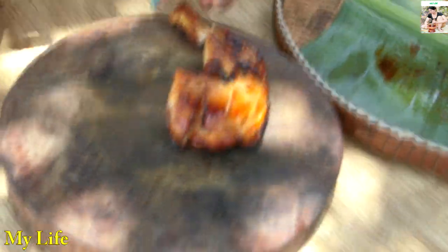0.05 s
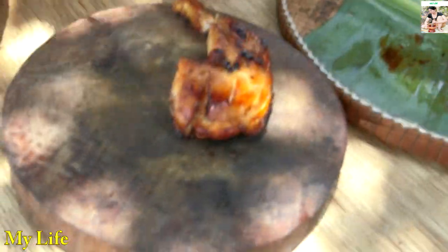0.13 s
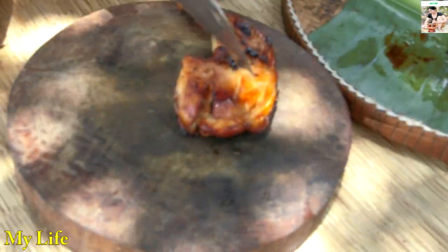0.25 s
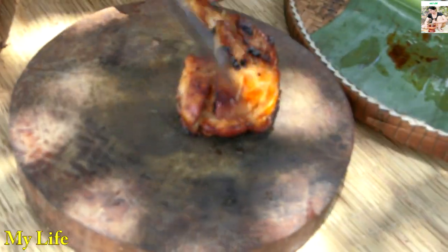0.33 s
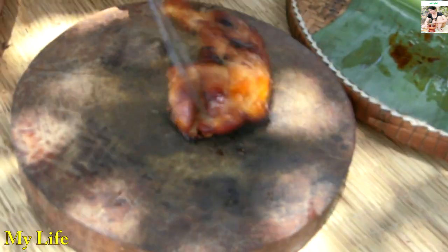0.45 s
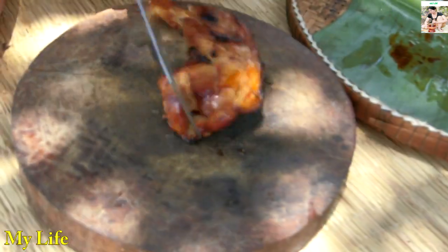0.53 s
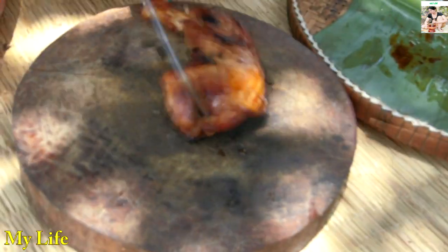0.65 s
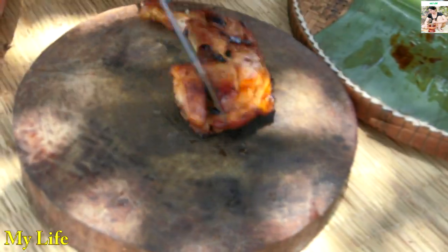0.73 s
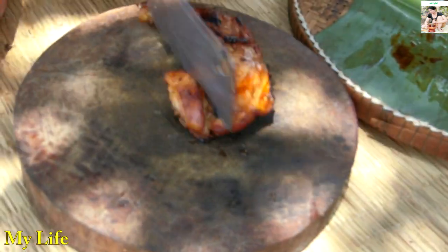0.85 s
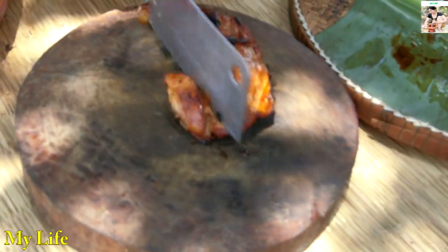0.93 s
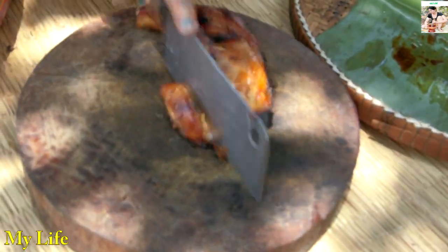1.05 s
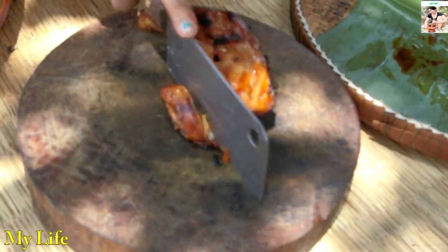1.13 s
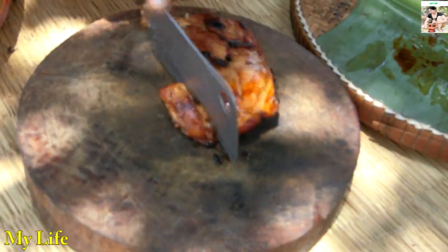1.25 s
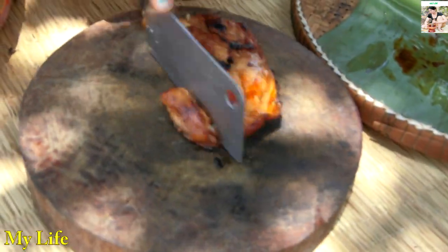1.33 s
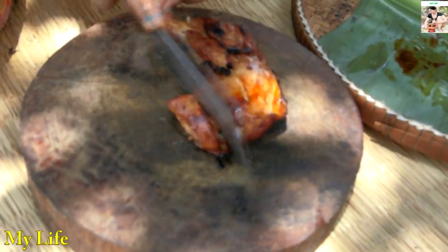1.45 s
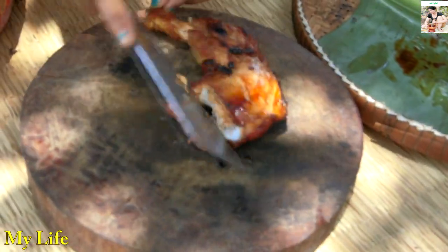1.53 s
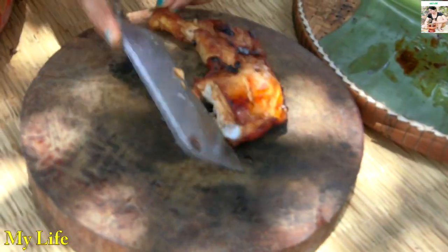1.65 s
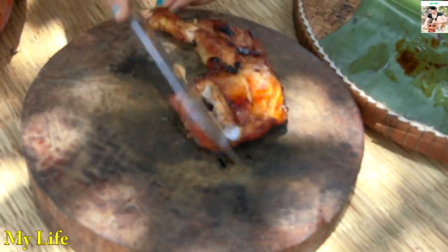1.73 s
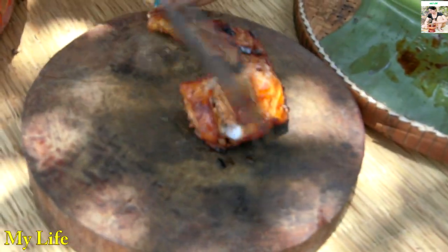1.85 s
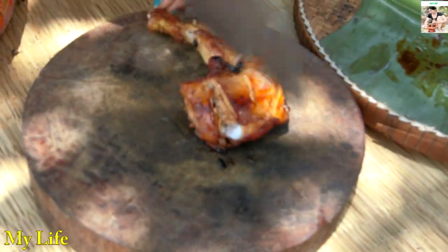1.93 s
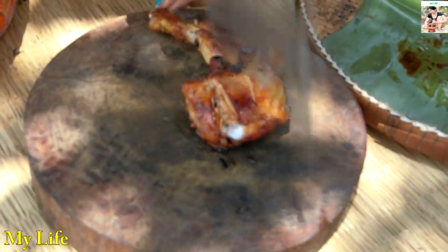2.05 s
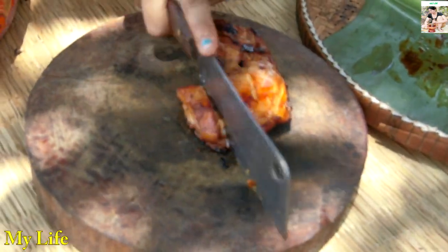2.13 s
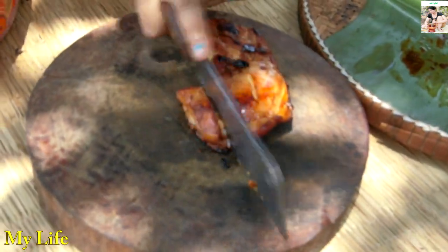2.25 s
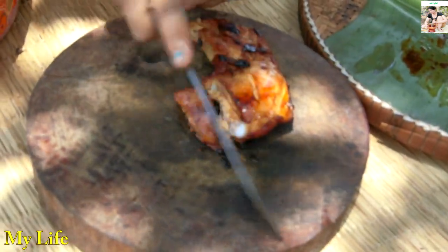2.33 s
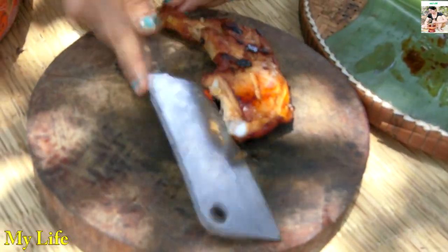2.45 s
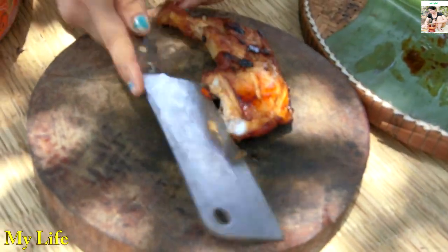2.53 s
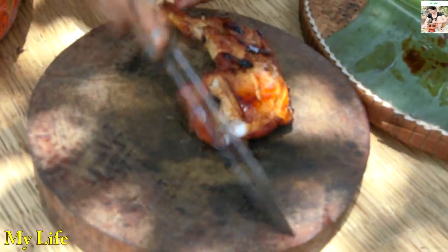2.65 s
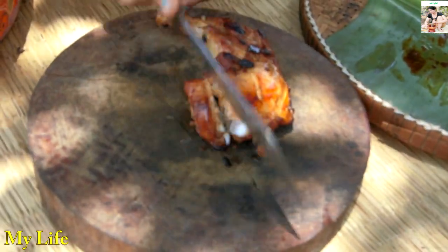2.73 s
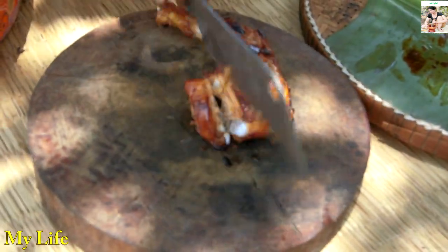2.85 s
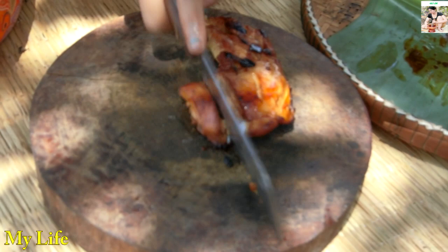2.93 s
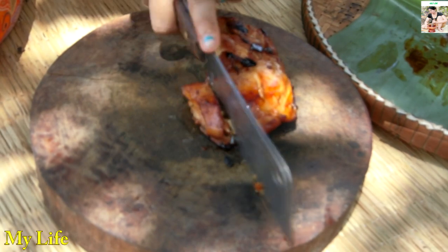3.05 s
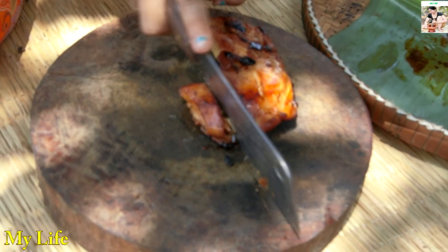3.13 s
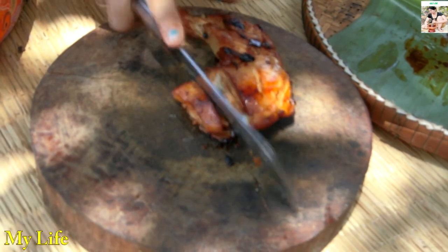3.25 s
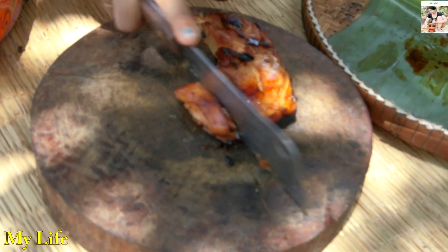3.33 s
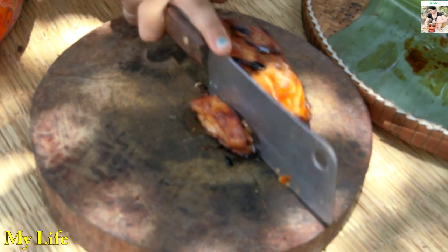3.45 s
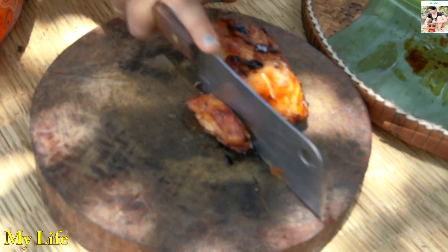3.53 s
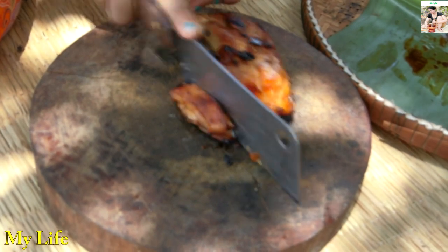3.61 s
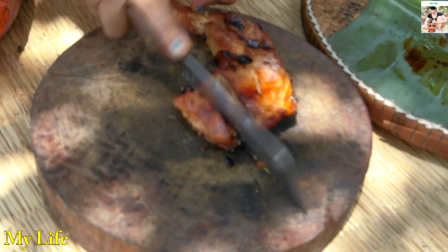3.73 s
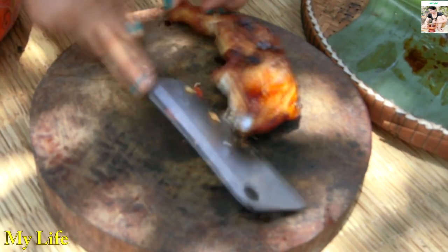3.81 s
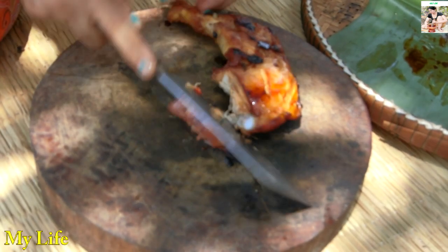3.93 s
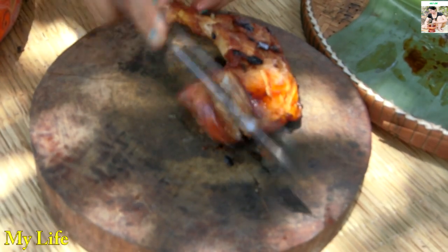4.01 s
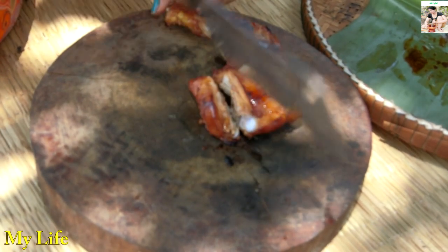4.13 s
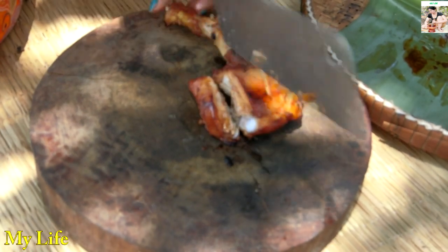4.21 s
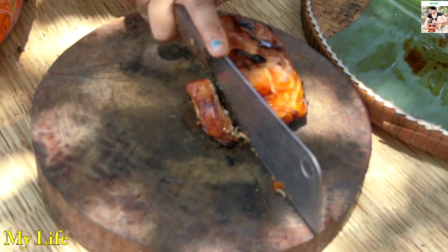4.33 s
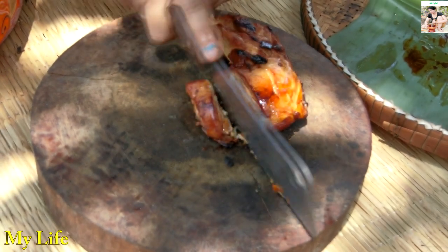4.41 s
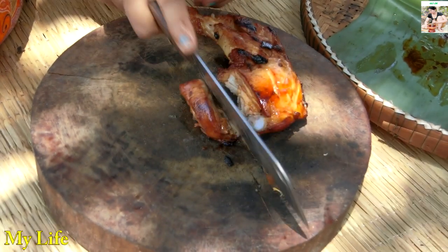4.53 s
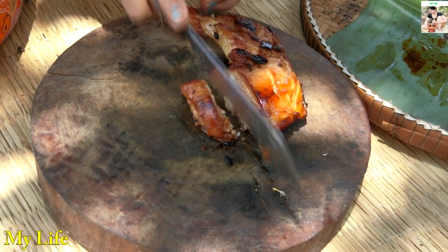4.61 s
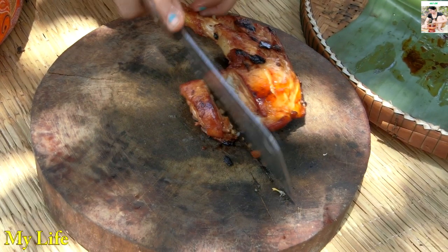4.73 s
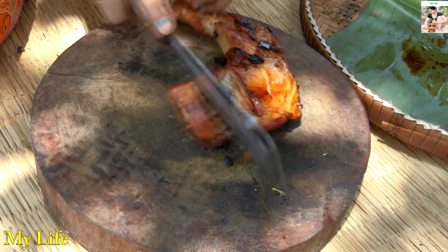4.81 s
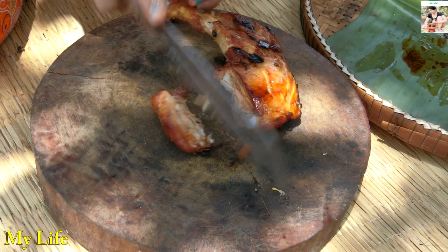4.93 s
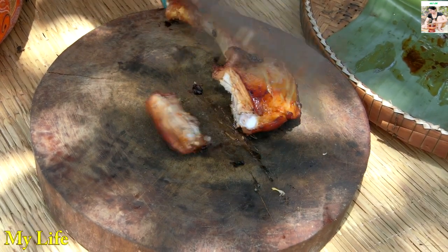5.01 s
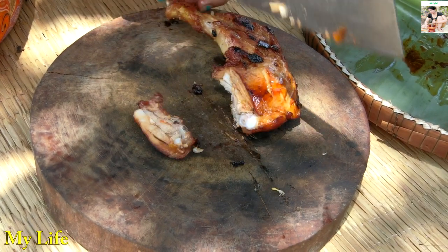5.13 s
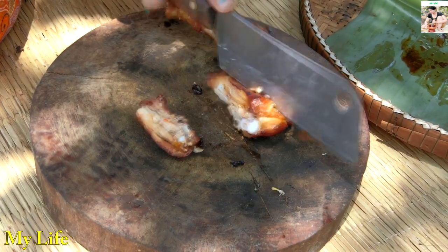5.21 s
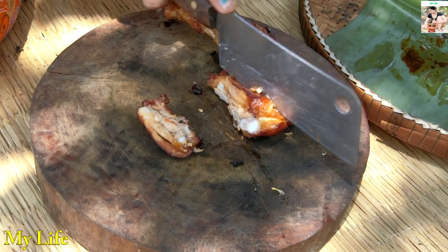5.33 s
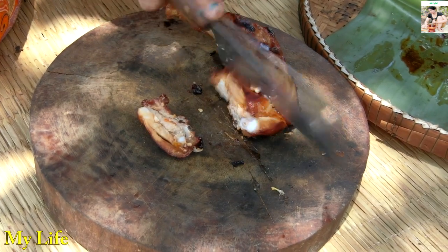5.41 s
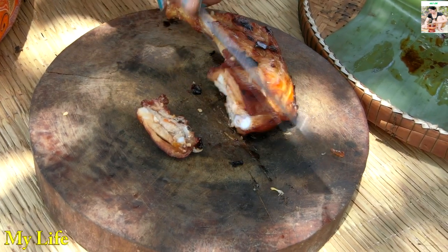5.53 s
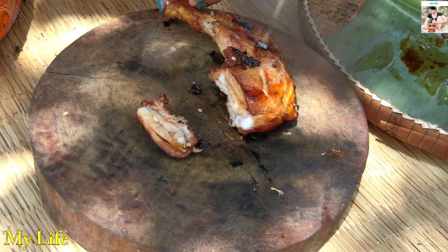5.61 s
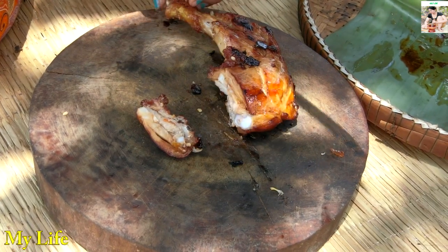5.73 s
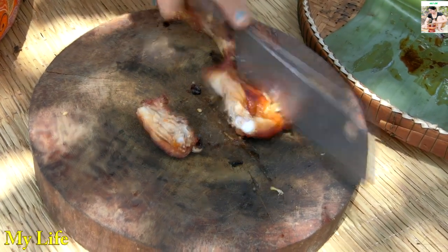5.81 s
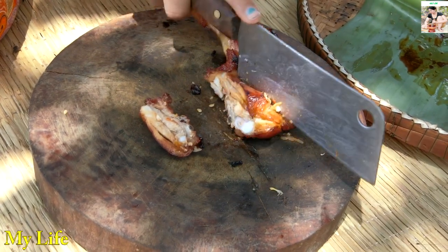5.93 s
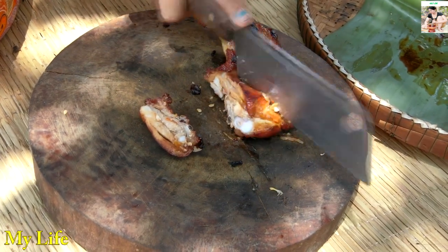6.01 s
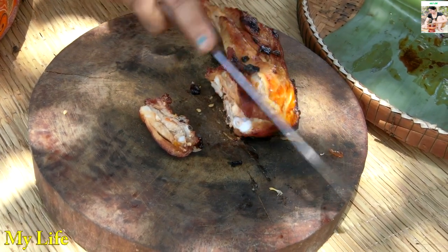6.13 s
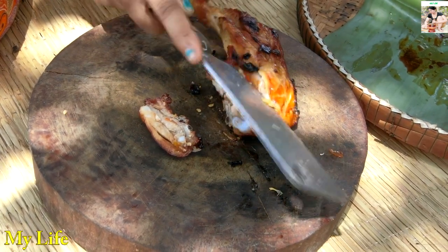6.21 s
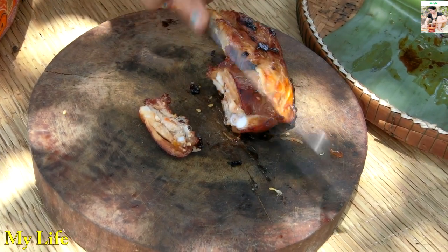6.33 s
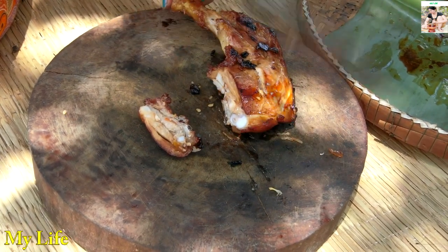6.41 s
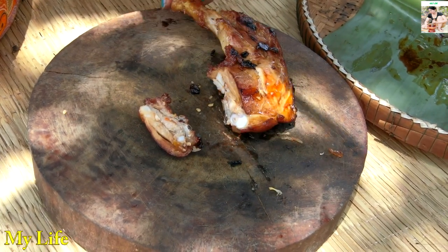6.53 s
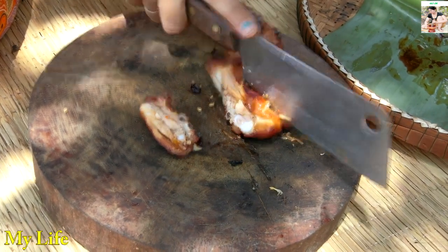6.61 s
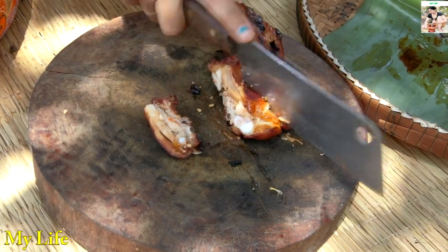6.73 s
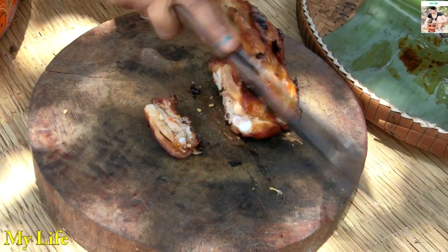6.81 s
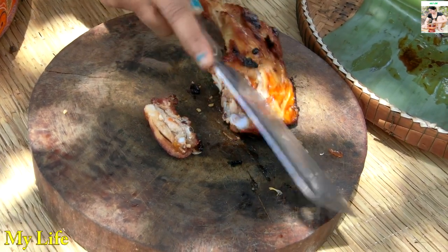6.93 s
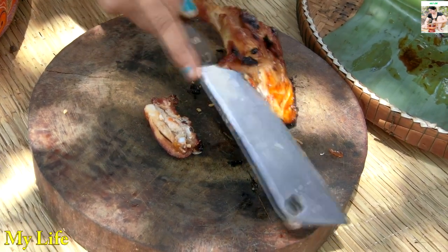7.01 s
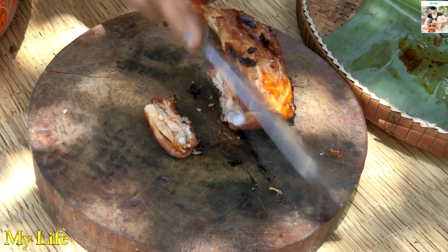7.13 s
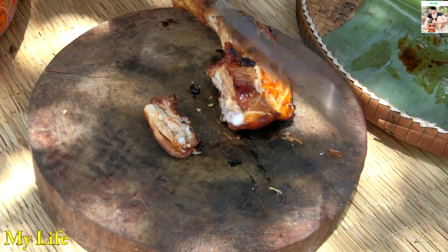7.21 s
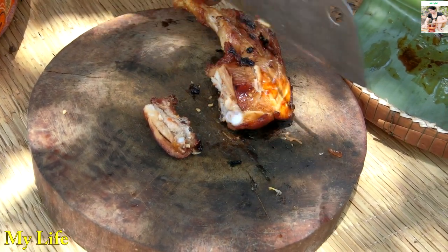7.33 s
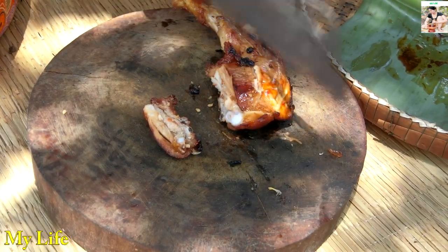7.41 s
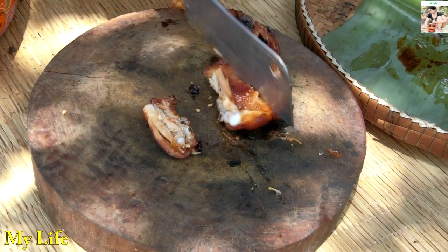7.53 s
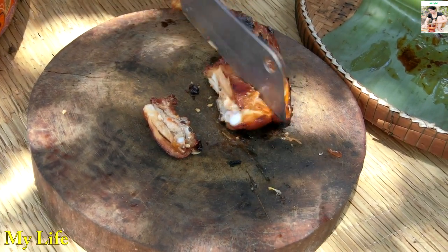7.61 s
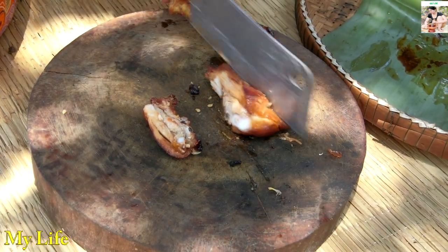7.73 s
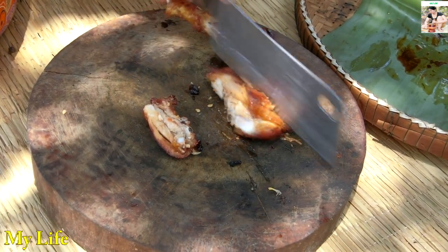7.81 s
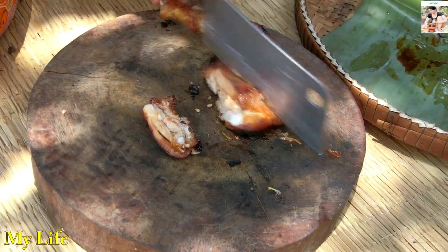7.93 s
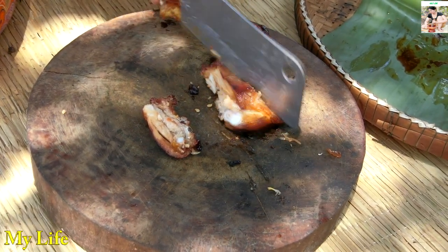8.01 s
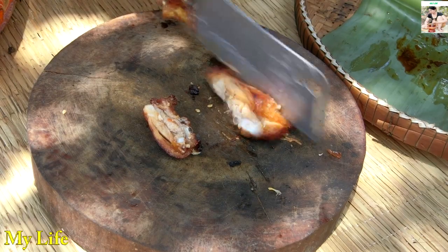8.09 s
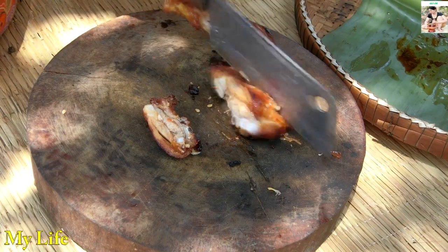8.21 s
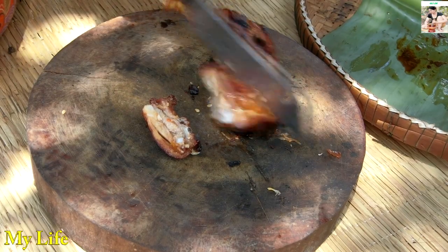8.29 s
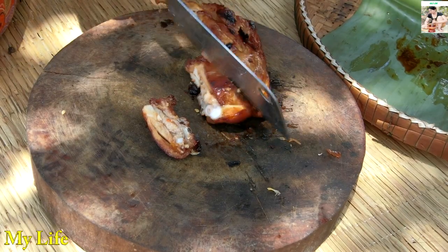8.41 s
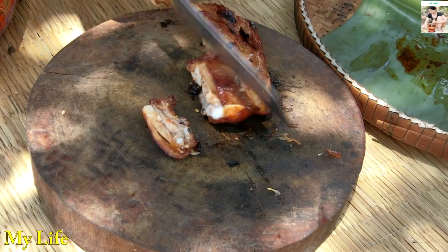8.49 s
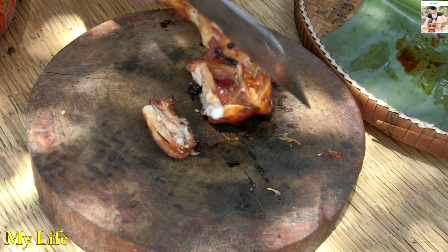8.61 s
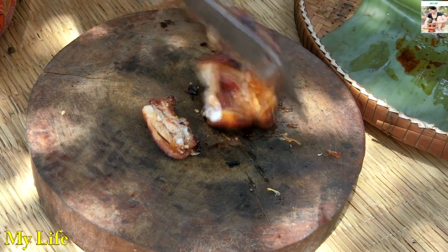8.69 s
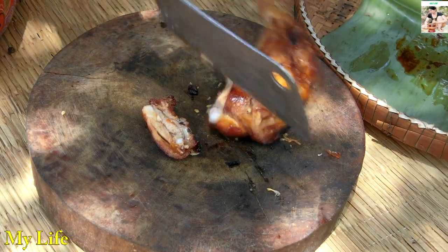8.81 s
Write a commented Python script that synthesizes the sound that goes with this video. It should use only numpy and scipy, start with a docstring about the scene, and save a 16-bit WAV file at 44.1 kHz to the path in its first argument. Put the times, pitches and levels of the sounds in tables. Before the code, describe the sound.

Close to the microphone, a steel cleaver first touches and scrapes roasted chicken, then strikes through skin and bone into a solid wooden block. Short aiming ticks come just before the chops, with gritty friction between them. The strongest knock comes in the middle, followed by softer cuts and a snapping bone, ending with rubbing and small taps. Behind are soft outdoor hush, a far-off revving engine, pulsing insects and three quick bird notes.

```python
"""An open yard, where a heavy cleaver chops cooked chicken on a thick wooden block.
The blade taps the bone to aim, crunches through and knocks into the wood: bursts of noise plus ringing tones.
Between chops it touches, slides over the meat and crackles the skin: noise that follows the push of the blade.
Far off an engine revs and a bird whistles (gliding tones), insects pulse and the air hushes (filtered noise).
The gain control ducks after hard chops and creeps back."""
import sys
import numpy as np
from scipy import signal
from scipy.fft import rfft, irfft
from scipy.io import wavfile
from scipy.ndimage import uniform_filter1d

SR = 44100
rng = np.random.default_rng(int(sys.argv[2]) if len(sys.argv) > 2 else 0)


def to_wav(s):
    """Save 16-bit WAV."""
    ch = np.atleast_2d(s).T  # columns
    pcm = np.round(np.clip(ch, -1, 1) * 32767)  # PCM
    wavfile.write(sys.argv[1], SR, pcm.astype(np.int16))


N = 390726
TIME = np.arange(N) / SR   # s
BLOW = np.arange(-SR // 100, SR // 5) / SR   # time around one contact, s

# All levels are ahead of the gain control; the functions trim some layers by a few dB.
# Hush of the open air: (frequency [Hz], level per Hz [dB]); only the shape counts
AIR_COLOUR = [(20, 4.5), (35, 2.5), (64, -6.5), (170, -9), (400, -8.5), (640, -7.5), (1130, -10),
              (2500, -12.5), (5000, -16.5), (10700, -17), (14800, -20), (16000, -32.5)]
# how far the two ears differ, added to the air's shape: (frequency [Hz], level [dB])
EAR_DIFFERENCE = [(100, -4.5), (1000, -9.0), (6000, -4)]
AIR_DB = -63.5

BUZZ_DB, BUZZ_HZ = -70, 4600
FIRST_BUZZ_S, BUZZ_EVERY_S, BUZZ_HALF_S = 2.08, .317, .052

# Distant engine: (time [s], firing rate [Hz], level [dB])
ENGINE_REVS = [(0, 87.3, -87), (.7, 91.1, -85), (0.989, 94.9, -77.5), (1.36, 149.9, -68.5),
               (1.598, 161.5, -77.5), (2.089, 99.8, -87), (2.361, 127.4, -74.5), (3.77, 106.4, -78),
               (4.928, 101.1, -75.5), (5.4, 111.6, -73), (6.699, 115.5, -78), (7.201, 97, -79),
               (7.872, 113.8, -74.5), (8.55, 114.7, -73.5), (8.86, 103.7, -75)]
# its partials: (multiple of the firing rate [times], level [dB])
ENGINE_PARTIALS = [(1, 0.5), (2, -12), (3, -10.5), (4, -12.5), (5, -9.5), (6, -14), (7, -13)]

# Bird notes: (start [s], length [s], top pitch [Hz], fall [octaves], level [dB])
BIRD_NOTES = [(2.29, 0.053, 3057, 0.12, -59.5), (2.402, .085, 4000, .24, -59.5),
              (2.488, .09, 3550, .31, -57.5)]
# where in a note its pitch tops and bottoms out, and where it is loudest (shares of its length)
NOTE_TOP, NOTE_LOW, NOTE_LOUDEST = .27, .82, 0.94

# Blade sliding over meat and wood: (hardest push [s], build-up [s], let-go [s], level [dB])
SLIDES = [(0.53, .07, 0.12, -63), (1.112, .12, 0.032, -49), (1.24, 0.026, 0.092, -54),
          (1.42, 0.034, 0.048, -60), (1.69, .03, 0.044, -58), (3.25, 0.097, .08, -59.5),
          (3.43, 0.045, 0.064, -57), (3.6, 0.033, .09, -53.5), (3.89, 0.16, .03, -57),
          (4.021, 0.034, 0.042, -56.5), (4.82, 0.013, 0.11, -50.5), (6.189, .05, 0.039, -63.5),
          (6.334, .025, 0.036, -51.5), (6.82, .14, 0.13, -65), (7.565, 0.045, 0.039, -60.5),
          (7.849, 0.098, 0.068, -57.5), (8.022, 0.081, 0.08, -57.5), (8.15, 0.066, 0.062, -54.5),
          (8.35, 0.072, 0.061, -57.5), (8.801, .12, 0.16, -64)]
# spectrum of the sliding noise: (frequency [Hz], level per Hz [dB]); only the shape counts
SLIDE_SPECTRUM = [(300, -11.5), (900, -3), (1600, -2.5), (3000, -2), (6000, -2.5), (11500, 0), (14500, -7),
                  (16000, -15)]
SLIDE_ENDS_DB = 13   # drop from the hardest push after one build-up or let-go time

# crisp skin breaking: added under a full stroke, and always there
CRACKLES_PER_S, IDLE_CRACKLES_PER_S = 24, .4
CRACKLE_DB, CRACKLE_SPREAD_DB = -58.5, 2.5

# Ringing tones of the free steel blade: (pitch [Hz], level [dB], time to fall 60 dB [s])
BLADE_TONES = [(2770, -6.5, 0.055), (3550, -6, .05), (4500, -8, 0.049), (5560, -16.5, .05),
               (7500, -13.5, 0.054), (9014, -5, 0.034), (9800, -11, .05), (11170, -5.5, 0.035),
               (14000, -2.5, 0.026)]
# Ringing tones of the block with the blade bedded in it, the short ones first,
# then the faint lingering ones: (pitch [Hz], level [dB], time to fall 60 dB [s])
BLOCK_TONES = [(131, 2, 0.01), (275, -1, .013), (549.7, -0.5, 0.014), (660, -2.5, 0.0083),
               (890.3, -4.5, 0.014), (1418, 2.5, 0.025), (2994, -1, 0.011), (718, -12.5, 0.045),
               (2130, -23, 0.08), (2780, -20, 0.06)]
FACE_LOW_HZ = 278   # the face of the block radiates little below this

# Blade touching bone or block between chops:
# (time [s], edge level [dB], body relative to edge [dB], strength of steel ring [dB])
TOUCHES = [(0.645, -39, -6, -0.5), (0.9386, -53, -5.5, -8), (1.0436, -40, -7.5, -16),
           (1.213, -52.5, 1.5, -14), (1.2201, -43.5, -20, -18), (1.5583, -48.5, -3.5, -3),
           (1.584, -47, -8, -16), (1.6945, -36, -7.5, -6), (2.473, -42.5, -24.5, 3.5),
           (2.4916, -45, -15.5, 14), (2.638, -61.5, 7, -1.5), (3.3781, -46, -13.5, -22.5),
           (3.4349, -43.5, -11.5, -20.5), (4.0034, -45, -5.5, 0), (4.021, -53.5, -13, 8),
           (4.097, -53.5, -2, -17.5), (4.538, -41.5, -5, -2), (4.813, -45.5, -17, 8),
           (5.3195, -46, -13, -13.5), (5.5476, -44, -6.5, -10.5), (6.3421, -38.5, -3, -9.5),
           (6.8907, -49.5, -15, -6.5), (7.5495, -53, -1, 0), (7.5807, -41, -5.5, -4),
           (8.4988, -45.5, 1.5, -3)]
# bone snapping apart around a chop: (time [s], edge level [dB])
BONE_SNAPS = [(5.2516, -35.5), (5.8682, -28), (6.6436, -14.5), (6.6521, -22.5)]
# how long before each chop the blade taps the bone to aim: (lead [s])
AIM_LEADS = [.068, .062, .06, .063, .079, .084]
# body relative to the edge, and strength of the steel ring
AIM_BODY_DB, AIM_RING_DB = -8.5, -8
SNAP_BODY_DB, SNAP_RING_DB = -7, -21.5
# top octave relative to the edge; dB lost per dB of body, since flat contacts are duller
TOP_DB, TOP_DULLING = -12, .7

# Chops: (time [s], thump [dB], thud [dB], knock [dB], bone crack [dB], skin crunch [dB],
# splintering afterwards [dB], edge ring [dB], aiming tap [dB])
CLEAVER_CHOPS = [(2.1671, -40.5, -24, -26.5, -20.5, -16, -29.5, -17, -40),
                 (2.9946, -48.5, -10.5, -11.5, -8.5, -14, -24.5, -27.5, -38.5),
                 (4.3484, -18, -7, -2, -6.5, -12, -26, -28, -36.5),
                 (5.258, -47, -38, -42, -25, -30, -34, -38, -38),
                 (5.8594, -41, -32.5, -32.5, -16, -21, -29.5, -29, -38.5),
                 (6.6409, -39.5, -24.5, -22, -21, -22, -21.5, -33, -32.5)]
# how long the meat holds the blade back before it knocks into the wood, one per chop: (delay [s])
KNOCK_DELAYS = [.0042, .0018, .0001, .001, .002, .001]
# the fractures peak this long after the block starts to sound
BONE_GIVES_S, SKIN_GIVES_S = .0008, 0.00023
EDGE_HZ, EDGE_T60_S = 11350, 0.023   # the thin edge rings as it bites

PORT_DB, PORT_T60_S = -8.5, .0016   # phase scatter between the two microphone ports
YARD_T60_S = .36   # fading time of the faint yard tail
CUTOFF_HZ = 15700


def from_db(db):
    """Turn decibels into a plain multiplier."""
    return 10 ** (np.asarray(db) / 20)


def rms_one(x):
    """Scale a sound to an average strength (rms) of 1."""
    return x / np.sqrt(np.mean(x ** 2) + 1e-20)


def unit_blow(x):
    """Scale a burst to the energy of 4 ms at rms 1."""
    return x / np.sqrt(np.sum(x ** 2) / (.004 * SR) + 1e-20)


def at_hz(points, hz):
    """Read a spectrum between its points, on a log-frequency axis."""
    f, db = np.transpose(points)
    return np.interp(np.log(np.maximum(hz, 1)), np.log(f), db)


def band(x, low_hz, high_hz, order=2):
    """Keep only the frequencies between two limits."""
    edges = [low_hz, min(high_hz, SR / 2 - 500)]
    return signal.sosfilt(signal.butter(order, edges, "band", fs=SR, output="sos"), x + 1e-18)


def coloured(x, spectrum):
    """Give a steady noise a spectrum; rms 1."""
    gain = from_db(at_hz(spectrum, np.fft.rfftfreq(N, 1 / SR)))
    return rms_one(irfft(rfft(x) * gain, N))


def drift(rate, size):
    """Wander at random between points with spread 1, drawn `rate` times a second."""
    knots = np.arange(size) * rate / SR
    count = int(knots[-1]) + 2
    return np.interp(knots, np.arange(count), rng.standard_normal(count))


def grains(size, spread_db):
    """Dense tiny fractures of unequal size, made as noise with random loudness."""
    sizes = np.minimum(rng.exponential(1, size), 4)
    return rms_one(rng.standard_normal(size) * from_db(spread_db * sizes))


def swell(rise_s, t60, late_s):
    """Loudness of a burst: rises by 60 dB in rise_s, then falls by 60 dB in t60."""
    t = BLOW - late_s
    return from_db(60 * np.minimum(t / rise_s, -t / t60))


def mode(hz, t60, late_s=0):
    """One struck resonance: a tone that dies away."""
    t = np.maximum(BLOW - late_s, 0)
    return unit_blow(-np.sin(2 * np.pi * hz * t) * from_db(-60 * t / t60))


def fracture(low_hz, high_hz, rise_s, t60, spread_db, late_s=0):
    """A burst of grainy noise in one band, as from many tiny fractures."""
    burst = grains(len(BLOW), spread_db) * swell(rise_s, t60, late_s)
    return unit_blow(band(burst, low_hz, high_hz))


def add(out, s, burst):
    """Lay a contact into the track at its time."""
    i = round((s + BLOW[0]) * SR)
    out[i:i + len(burst)] += burst[:N - i]


def air():
    """Open-air hush from noise; the two ears differ least around 1000 Hz."""
    apart_colour = [(hz, db + at_hz(EAR_DIFFERENCE, hz)) for hz, db in AIR_COLOUR]
    shared = coloured(rng.standard_normal(N), AIR_COLOUR)
    apart = coloured(rng.standard_normal(N), apart_colour)
    ears = shared + from_db(-1.5) * apart * [[1], [-1]]   # opposite sign in each ear
    return from_db(AIR_DB) * ears * from_db(0.6 * drift(11.0, N))


def insects():
    """Short narrow buzzes at a steady beat of about three a second, some louder than others."""
    gate = np.zeros(N)
    for s in np.arange(FIRST_BUZZ_S, TIME[-1], BUZZ_EVERY_S):
        gate += from_db(rng.normal(0, 1.5)) * np.exp(-((TIME - s) / BUZZ_HALF_S) ** 4)
    buzz = rms_one(band(rng.standard_normal(N), BUZZ_HZ - 350, BUZZ_HZ + 350))
    return from_db(BUZZ_DB) * gate * buzz


def engine():
    """Far exhaust pulses; the silencer colours them, and under high revs a resonance picks out one partial."""
    s, hz, db = np.transpose(ENGINE_REVS)
    rate = np.interp(TIME, s, hz) * (1 + 0.008 * drift(23, N))
    phase = 2 * np.pi * np.cumsum(rate) / SR
    pipe_hz, silencer_hz, silencer_db = 775, 599, 7
    high_revs = np.clip((rate - 125) / 20, 0, 1)
    out = np.zeros(N)
    for k, (_, level_db) in enumerate(ENGINE_PARTIALS, 1):
        pipe_db = 13 * np.exp(-((k * rate - pipe_hz) / 70) ** 2) * high_revs
        boom_db = silencer_db * np.exp(-((k * rate - silencer_hz) / 35) ** 2)
        partial_db = level_db + pipe_db + boom_db + 0.73 * drift(12, N)
        out += from_db(partial_db) * np.sin(k * phase)
    return np.sqrt(2) * from_db(np.interp(TIME, s, db)) * out


def bird():
    """Each whistle arches over its top pitch, then swells as it falls."""
    out = np.zeros(N)
    # the last value stays on after the note, as an extremely faint tone
    shares = [0, .1, NOTE_LOUDEST / 2, NOTE_LOUDEST, 1]
    strengths = [0, 0.43, 0.41, 1, 0.028]
    for s, length_s, top_hz, fall, db in BIRD_NOTES:
        along = np.clip((TIME - s) / length_s, 0, 1)
        sunk = np.sin(np.pi / 2 * (along - NOTE_TOP) / (NOTE_LOW - NOTE_TOP)) ** 2
        pitch = top_hz * 2 ** (-fall * sunk) * (1 + 0.0132 * drift(280, N))
        loudness = np.interp(along, shares, strengths)
        out += from_db(db) * loudness * np.sin(2 * np.pi * np.cumsum(pitch) / SR)
    return np.sqrt(2) * out


def yard(x, near_db, near_t60, far_db, far_t60):
    """Scatter from the table and things nearby, then a faint, longer tail in a narrower band."""
    t = np.arange(SR // 2) / SR
    onset = np.clip((t - .004) / 0.012, 0, 1)
    near = band(rng.standard_normal((2, len(t))), 350, 11000, order=1) * onset * from_db(-60 * t / near_t60)
    far = band(rng.standard_normal((2, len(t))), 1700, 6000, order=1) * onset * from_db(-60 * t / far_t60)
    echo = np.zeros((2, len(t)))
    for db, tail in ((near_db, near), (far_db, far)):
        echo += from_db(db) * tail / np.sqrt(np.sum(tail ** 2) / 2)
    return signal.fftconvolve(x[None], echo, axes=1)[:, :N]


def pressure():
    """How hard the blade drags: each stroke builds up to its hardest push and lets go."""
    out = np.zeros(N)
    for s, build_s, let_go_s, db in SLIDES:
        away = np.minimum(np.maximum((s - TIME) / build_s, (TIME - s) / let_go_s), 4)
        out += from_db(db - SLIDE_ENDS_DB * away ** 0.94)
    return out


def crackles(push):
    """Crisp skin breaks at random, more often under the moving blade; ticks vary in size and in six pitches."""
    rate = IDLE_CRACKLES_PER_S + CRACKLES_PER_S * np.minimum(push / from_db(-56.5), 1)
    sizes_db = CRACKLE_DB + CRACKLE_SPREAD_DB * np.clip(rng.standard_normal(N), -2, 2)
    clicks = (rng.random(N) < rate / SR) * from_db(sizes_db)
    pitches = np.geomspace(3600, 11000, 6)   # Hz
    dealt = rng.integers(len(pitches), size=N)   # which pitch each click gets
    out = np.zeros(N)
    for k, hz in enumerate(pitches):
        tick = fracture(low_hz=hz / 2, high_hz=hz * 2, rise_s=.002, t60=0.018, spread_db=1)
        out += signal.fftconvolve(clicks * (dealt == k), tick)[:N]
    return out


def slide(push):
    """The blade drags in uneven slips; the friction faintly sings in the steel."""
    slips = grains(N, spread_db=6) * from_db(2.9 * drift(160, N))
    friction = coloured(slips, SLIDE_SPECTRUM)
    blade_ring = sum(mode(hz, t60) for hz, _, t60 in BLADE_TONES)
    steel = signal.fftconvolve(friction, blade_ring)[:N]
    return push * (friction + from_db(-11.5) * rms_one(steel))


def contact(edge_db, body_rel_db, ring_db):
    """A light contact is a short gritty click that sets the blade ringing."""
    body_db = edge_db + body_rel_db
    top_db = edge_db + TOP_DB - TOP_DULLING * body_rel_db
    body = from_db(body_db) * fracture(low_hz=1400, high_hz=4700, rise_s=.005, t60=0.016, spread_db=2.0)
    wood = from_db(body_db - 11.0) * fracture(
        low_hz=385, high_hz=1450, rise_s=0.0016, t60=0.036, spread_db=3)
    edge = from_db(edge_db - 1.5) * fracture(
        low_hz=5300, high_hz=11000, rise_s=.006, t60=0.019, spread_db=5.5)
    top = from_db(top_db - 1.0) * fracture(
        low_hz=10400, high_hz=14500, rise_s=0.0057, t60=0.018, spread_db=4)
    # each blade tone is driven by the click's strength near its pitch
    force = [(4000, body_db), (6000, edge_db), (9500, edge_db), (14000, top_db)]
    steel = np.zeros(len(BLOW))
    for hz, db, t60 in BLADE_TONES:
        tone_db = at_hz(force, hz) + db + ring_db + rng.normal(0, 2.7)
        steel += from_db(tone_db) * mode(hz, t60)
    return body + wood + edge + top + steel


def taps():
    """An aiming tap just before each chop, bone snapping around the blow, and stray touches in between."""
    aims = [(s - lead_s, db, AIM_BODY_DB, AIM_RING_DB)
            for (s, *_, db), lead_s in zip(CLEAVER_CHOPS, AIM_LEADS)]
    snaps = [(s, db, SNAP_BODY_DB, SNAP_RING_DB) for s, db in BONE_SNAPS]
    out = np.zeros(N)
    for s, edge_db, body_db, ring_db in [*aims, *snaps, *TOUCHES]:
        add(out, s, contact(edge_db, body_db, ring_db))
    return out


def block(thump, thud, knock, delay_s):
    """The block thumps and thuds under the meat; its tones above 1000 Hz knock after the delay."""
    force = [(250, thump), (480, thud), (900, thud), (1350, knock)]
    whole, face = np.zeros(len(BLOW)), np.zeros(len(BLOW))
    for k, (hz, db, t60) in enumerate(BLOCK_TONES):
        late_s = delay_s * (hz > 1000)
        # neighbouring tones start in opposite directions
        ring = from_db(at_hz(force, hz) + db) * mode(hz, t60, late_s) * (-1) ** k
        if hz < FACE_LOW_HZ:
            whole += ring
        else:
            face += ring
    return whole + band(face, FACE_LOW_HZ, SR / 2)


def chops():
    """The edge crunches through skin and bone, lands in the block, and splinters give way after it."""
    out = np.zeros(N)
    for chop, delay_s in zip(CLEAVER_CHOPS, KNOCK_DELAYS):
        s, thump, thud, knock, crack, crunch, splinter, edge_db, _ = chop
        # a faint broad noise swelling and fading around the blow
        hiss = from_db(crunch - 11.5) * fracture(
            low_hz=1500, high_hz=14000, rise_s=.02, t60=.006, spread_db=1.0)
        bone = from_db(crack - 2.5) * fracture(
            low_hz=1750, high_hz=4630, rise_s=0.0014, t60=0.014, spread_db=1.17, late_s=BONE_GIVES_S)
        skin = from_db(crunch) * fracture(
            low_hz=5040, high_hz=14000, rise_s=0.0073, t60=0.013, spread_db=-0.84, late_s=SKIN_GIVES_S)
        splinters = from_db(splinter - 1.0) * fracture(
            low_hz=1670, high_hz=13700, rise_s=.005, t60=0.14, spread_db=2.5)
        edge = from_db(edge_db) * mode(EDGE_HZ, EDGE_T60_S)
        add(out, s, block(thump, thud, knock, delay_s) + hiss + bone + skin + splinters + edge)
    return out


def ports(x):
    """The treble reaches the two ports at phases that vary with frequency; the left port is a little louder."""
    t = np.arange(SR // 400) / SR
    half = band(rng.standard_normal(len(t)) * from_db(-60 * t / PORT_T60_S), 3000, 15000)
    scatter = np.concatenate([-half[::-1], [0], half])   # mirrored with opposite sign
    side = signal.fftconvolve(x, scatter / np.sqrt(np.sum(scatter ** 2)), mode="same")
    left_db = 1.05   # left up by this, right down by this
    return (x + from_db(PORT_DB) * side * [[1], [-1]]) * from_db([[left_db], [-left_db]])


def scene():
    """The block is close and a little to the left; engine, bird and insects are far off."""
    far_off = air() + insects() + engine() + bird()
    push = pressure()
    close = crackles(push) + slide(push) + taps() + chops()
    echoes = yard(close, near_db=-19.5, near_t60=0.11, far_db=-34, far_t60=YARD_T60_S)
    return ports(close) + echoes + far_off


def gain_control(x, threshold_db, slope, attack_s, release_db_per_s):
    """Loud blows pull the gain down within milliseconds; it creeps back over seconds."""
    power = uniform_filter1d(np.mean(x ** 2, axis=0), size=176)   # averaged over 4 ms
    level_db = 10 * np.log10(np.maximum(power, 1e-12))
    cut_db = slope * np.maximum(level_db - threshold_db, 0)
    # hold the deepest cut so far, letting go at a steady rate
    released_db = release_db_per_s * TIME
    held = np.maximum.accumulate(cut_db + released_db) - released_db
    r = np.exp(-1 / (attack_s * SR))
    return x * from_db(-signal.lfilter([1 - r], [1, -r], held))


def record(dry):
    """Gain control, overload that rounds off the loudest peaks, and the top cut."""
    x = gain_control(dry, threshold_db=-23.5, slope=0.55, attack_s=0.0054, release_db_per_s=5.0)
    ceiling = .7   # peaks bend over towards this
    x = x / (1 + (x / ceiling) ** 6) ** (1 / 6)
    return signal.sosfilt(signal.ellip(10, .1, 80, CUTOFF_HZ, fs=SR, output="sos"), x)


dry = scene()
out = record(dry)
to_wav(out)
```